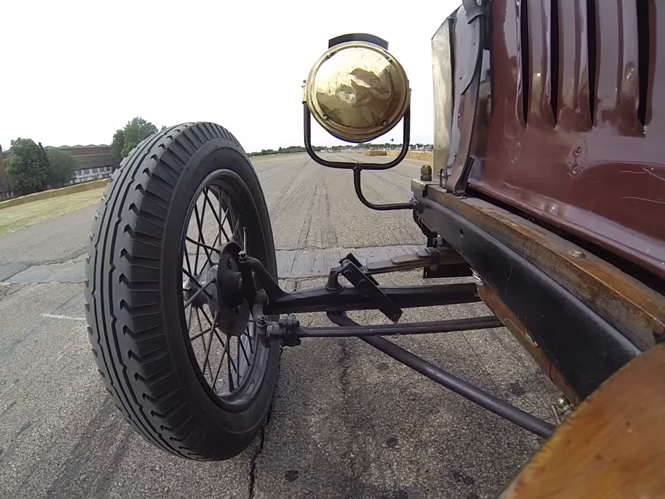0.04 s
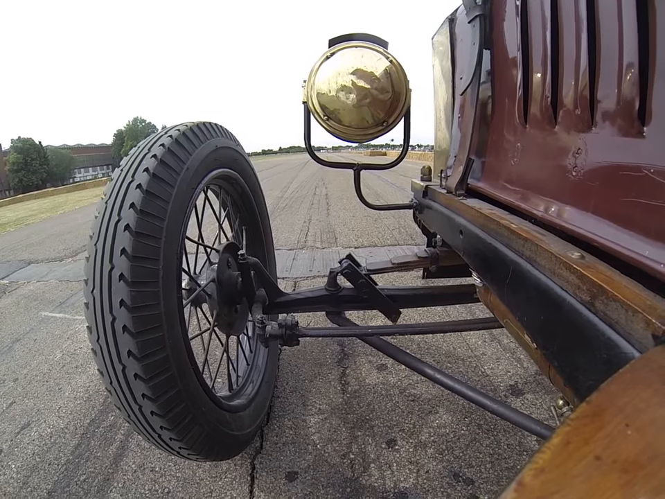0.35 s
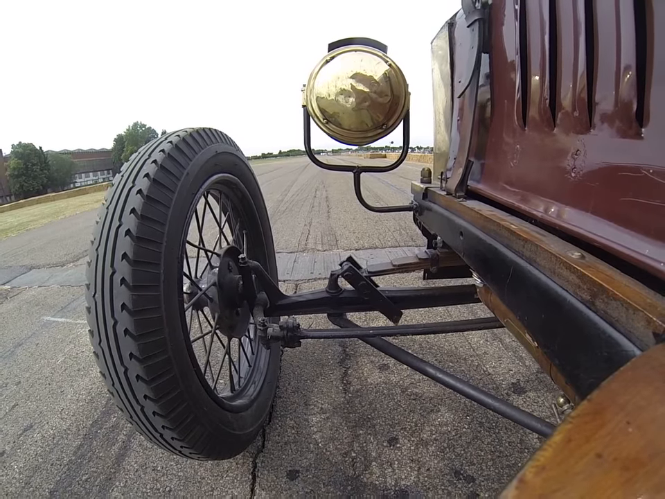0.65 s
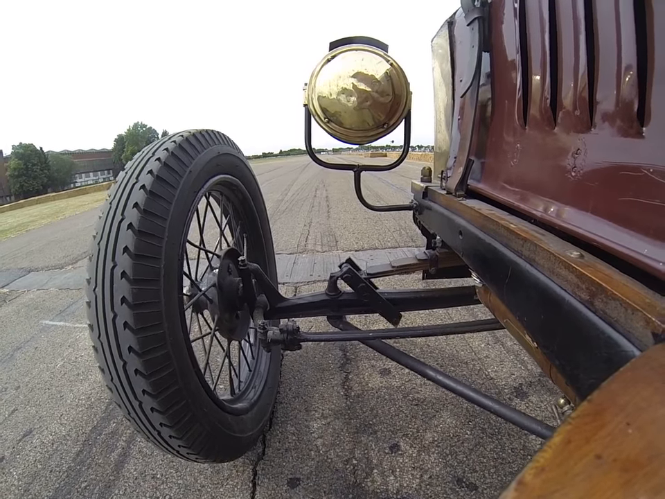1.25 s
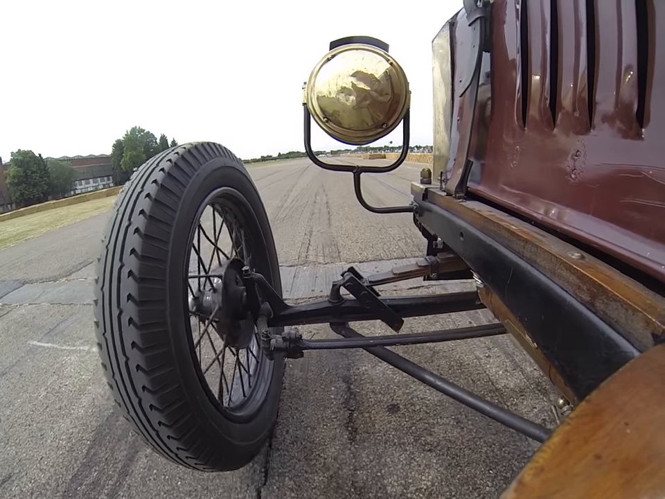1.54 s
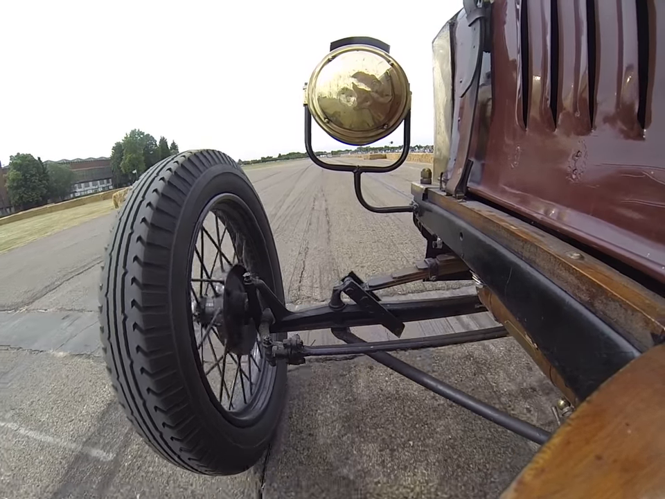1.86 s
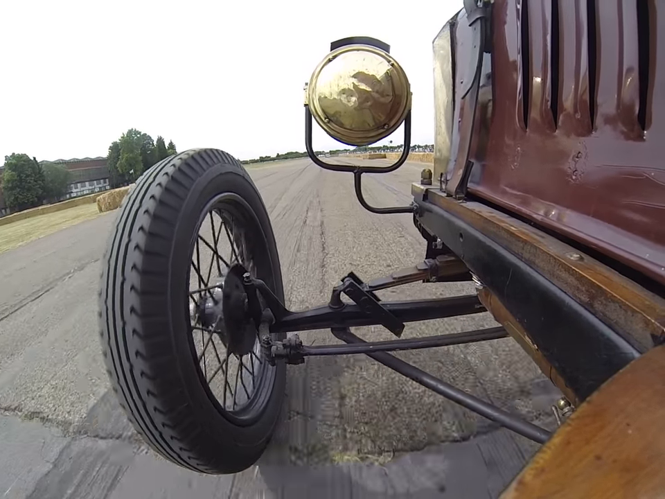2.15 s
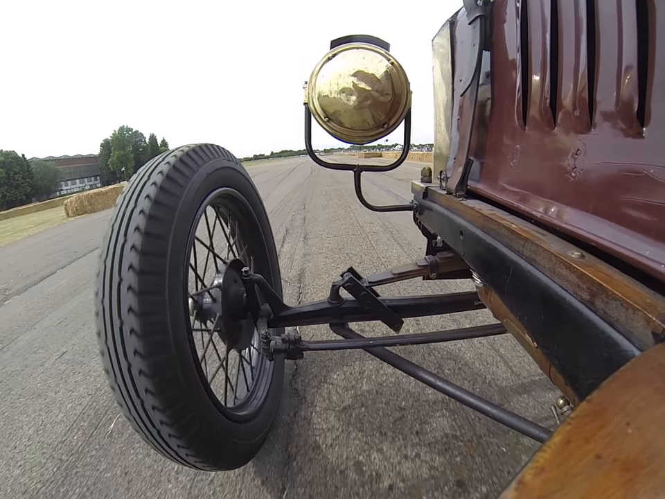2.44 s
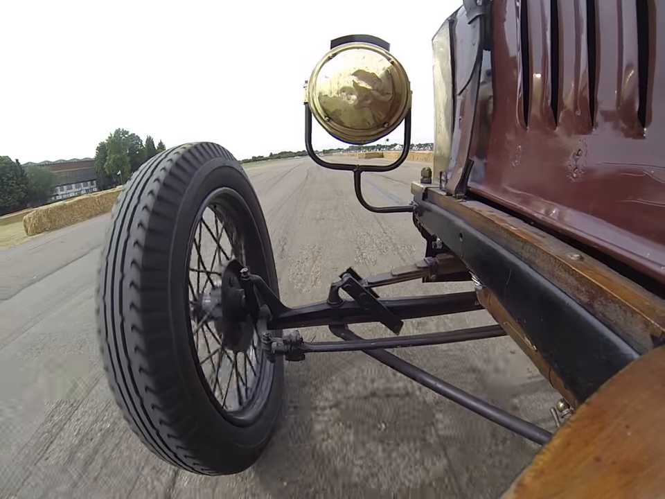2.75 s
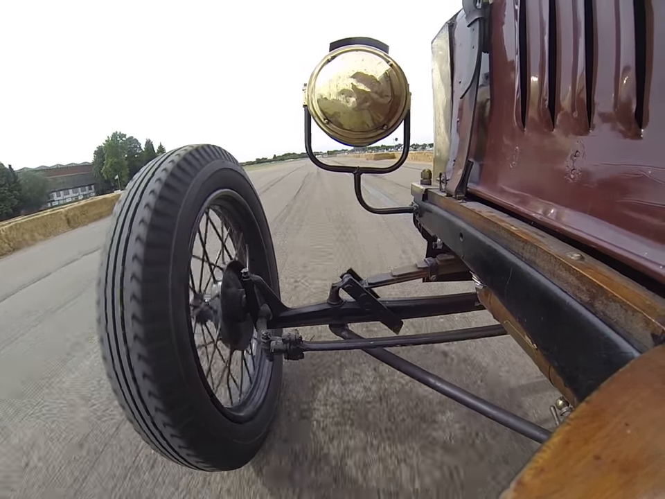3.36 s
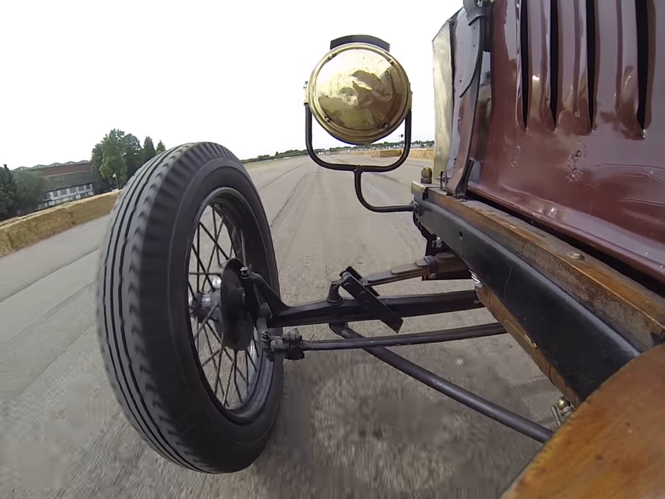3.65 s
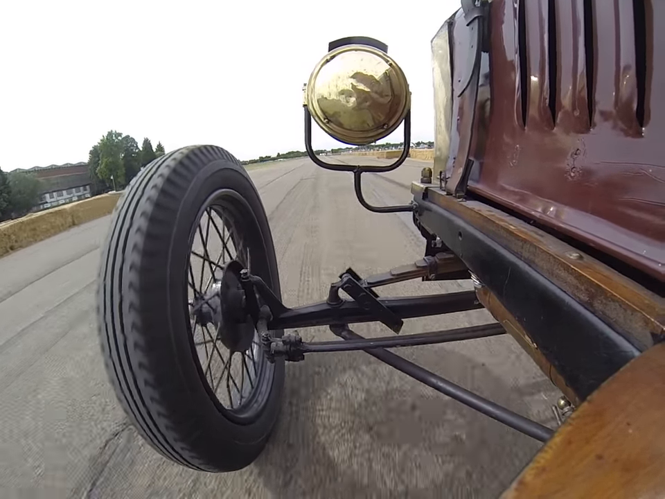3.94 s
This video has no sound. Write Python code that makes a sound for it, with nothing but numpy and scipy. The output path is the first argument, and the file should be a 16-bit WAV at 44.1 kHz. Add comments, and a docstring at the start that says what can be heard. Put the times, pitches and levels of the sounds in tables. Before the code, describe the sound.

An old car's petrol engine idles, revs, sags, then pulls away with a throaty clatter.

```python
"""A vintage four-cylinder petrol engine, heard from beside the car's bonnet.
It idles, revs, sags as the clutch bites, then pulls away. Every firing thumps the exhaust and
barks in a throaty resonance, one cylinder harder than the others. The valve gear clatters,
loose fittings tick, and a little wind rumbles on the microphone."""
import sys
import numpy as np
from scipy import signal
from scipy.fft import rfft, irfft, next_fast_len
from scipy.io import wavfile
from scipy.ndimage import uniform_filter1d, minimum_filter1d, map_coordinates

SR = 44100
rng = np.random.default_rng(int(sys.argv[2]) if len(sys.argv) > 2 else 0)


def digitize_waveform(pressure):
    """Quantize a signal to 16-bit integers and store it at the path in sys.argv[1].

    Rows of a 2-D input are taken as channels; values are limited to [-1, 1].
    """
    field = np.atleast_2d(pressure).T
    bounded = np.clip(field, -1, 1)
    quanta = np.round(bounded * 32767).astype(np.int16)
    wavfile.write(sys.argv[1], SR, quanta)


N = 176400

# Engine metal response. Each row: frequency in Hz, gain in dB.
METAL_COLOUR = [(450, -24), (760, 1), (900, -7.5), (1100, -11), (1320, -2), (1500, -2.5), (1780, 1.5),
                (1950, 1), (2180, -10.5), (2480, -11.5), (2850, -23.5), (3400, -26.5), (4500, -33.5),
                (7000, -62.5)]
# Upper engine layers. Each row: time in seconds, then bark, tap and hiss levels in dB before trim.
UPPER_LEVELS = [(0.11, -25, -35.8, -58), (0.2, -20.3, -34, -61.5), (0.33, -29, -38.5, -65),
                (0.43, -25, -34.5, -59.5), (0.58, -30.5, -39.5, -64), (0.7, -22, -36, -57.5),
                (0.83, -26, -34, -57.5), (0.94, -22, -35.7, -60), (1.03, -20.5, -32.5, -55),
                (1.4, -18.2, -28.5, -53.5), (1.7, -20.5, -28, -53), (1.95, -17.5, -24.5, -50.5),
                (2.1, -23, -29.5, -55), (2.25, -19, -29.5, -54), (2.35, -27.5, -29.5, -58),
                (2.48, -17, -31, -53.5), (2.6, -21, -39, -57.5), (2.73, -22.5, -36.7, -63),
                (2.87, -21, -36, -57.1), (3.0, -20, -31, -55.5), (3.3, -16.5, -32.5, -53.5),
                (3.55, -15.5, -29.5, -51.5), (3.75, -16.5, -31.5, -53), (3.95, -16.5, -29.5, -52.0)]


def amp(db):
    """Decibels to gain."""
    return 10 ** (np.asarray(db) / 20)


def curves(rows):
    """One value per sample for each column after the time."""
    times_s, *columns = np.transpose(rows)
    return [np.interp(np.arange(N) / SR, times_s, column) for column in columns]


def wobble(rate_hz):
    """Smooth random curve, rate_hz knots a second."""
    knots = rng.standard_normal(int(N * rate_hz / SR) + 4)
    return map_coordinates(knots, [np.arange(N) * rate_hz / SR])


def steady(x):
    """x with its slow level held at rms 1."""
    power = uniform_filter1d(uniform_filter1d(x * x, size=6000), size=6000)
    return x / np.sqrt(np.abs(power) + 1e-14)


def ring(x, colour):
    """x through a minimum-phase body with the given (Hz, dB) colour, rolled off above it."""
    size = 2 * next_fast_len(N // 2 + 8192)
    bins_hz = np.fft.rfftfreq(size, 1 / SR)
    hz, db = np.transpose(colour)
    gain = amp(np.interp(np.log(bins_hz + 1), np.log(hz + 1), db))
    gain /= 1 + (bins_hz / (2 * hz.max())) ** 4
    cepstrum = irfft(np.log(np.maximum(gain, 1e-6)), size)
    cepstrum[1:size // 2] *= 2
    cepstrum[size // 2 + 1:] = 0
    return irfft(rfft(x, size) * np.exp(rfft(cepstrum)), size)[:N]


def puffs(hits, decay_s):
    """A burst of turbulence after each impulse, with the impulse's energy."""
    decay = np.exp(-np.arange(SR // 8) / SR / decay_s)
    return signal.fftconvolve(hits, decay / np.linalg.norm(decay))[:N] * rng.standard_normal(N)


def strokes(turns, cylinders_db, scatter_db, jitter_s, per_turn=2):
    """Impulses locked to the crank, sized by the cylinder whose turn it is."""
    stroke = np.arange(np.ceil(turns[0] * per_turn), turns[-1] * per_turn).astype(int)
    timing, strength = rng.standard_normal((len(stroke), 2)).T
    at = np.interp(stroke / per_turn, turns, np.arange(N)) + jitter_s * SR * timing
    cylinder = (stroke * 2 // per_turn) % len(cylinders_db)
    level_db = np.asarray(cylinders_db)[cylinder] + scatter_db * strength
    return np.bincount(np.clip(at, 0, N - 1).astype(int), amp(level_db), N)


def blows(rows, colour, decay_s, rough):
    """Single blows, impulse plus noise burst, through a body; one per (start s, peak dB) row."""
    out = np.zeros(2 * N)
    body = ring(signal.unit_impulse(N), colour)[:SR // 8]
    decay = np.exp(-np.arange(SR // 8) / SR / decay_s)
    for start_s, peak_db in rows:
        push = rough * decay / np.linalg.norm(decay) * rng.standard_normal(len(decay))
        push[0] += 1
        blow = signal.fftconvolve(push, body)
        out[round(start_s * SR):][:len(blow)] += amp(peak_db) * blow / np.abs(blow).max()
    return out[:N]


def voice(hits, colour, rough, decay_s, flow):
    """Pulses, their turbulence and unbroken flow noise ringing one body, at rms 1."""
    drive = steady(hits + rough * puffs(hits, decay_s)) + flow * rng.standard_normal(N)
    return steady(ring(drive, colour))


def drone(turns, orders_db, flutter_db):
    """Clean low orders of the crankshaft; the second is the firing note."""
    trims_db = [0.15, 1.2, 1.1, 0.74, -0.27]  # orders 1-5
    out = np.zeros(N)
    for order, (level_db, trim_db) in enumerate(zip(orders_db, trims_db), start=1):
        rms = amp(level_db + trim_db + flutter_db * wobble(rate_hz=16))
        out += np.sqrt(2) * rms * np.sin(2 * np.pi * (order * turns + rng.random()))
    return out


def exhaust(turns):
    """Firings boom and rasp in the pipe; it coughs as the throttle opens or the load takes hold."""
    cylinders_db = [6.5, -3.5, -2.5, 4]  # strengths in firing order
    # Each row: time in seconds, then boom and rasp levels in dB before trim.
    levels = [(0.05, -25.5, -36), (0.2, -17.5, -22), (0.35, -30, -32.5), (0.44, -16, -28.5),
              (0.6, -18, -27.5), (0.75, -16, -22.5), (0.95, -19.5, -21), (1.13, -17, -24),
              (1.35, -27.5, -23.5), (1.7, -22.5, -26), (2.05, -23, -30.5), (2.25, -16, -28),
              (2.5, -16.5, -26), (2.75, -26.5, -26), (3.05, -20, -28), (3.4, -22, -26),
              (3.97, -20.5, -21.5)]
    # Each row: start in seconds, peak in dB.
    coughs = [(0.421, -6), (0.533, -6.5), (0.801, -7.5), (2.628, -4), (2.695, -11.5), (2.818, -9.5)]
    # Pipe responses. Each row: frequency in Hz, gain in dB.
    boom_colour = [(40, -28), (70, -10.5), (100, -1.5), (125, 2), (148, -3), (180, -18.5), (350, -43.5),
                   (900, -74)]
    rasp_colour = [(90, -37), (165, -9), (200, -2.5), (240, 0), (290, 0), (320, -5.5), (365, -14),
                   (600, -30.5), (1500, -62)]
    cough_colour = [(30, -11.5), (125, 6), (280, -7.5), (600, -30), (2000, -46)]
    boom_db, rasp_db = curves(levels)
    firings = strokes(turns, cylinders_db, scatter_db=2.5, jitter_s=0.00042)
    boom = amp(boom_db + 0.25) * voice(firings, boom_colour, rough=0.85, decay_s=0.012, flow=0.45)
    rasp = amp(rasp_db - 0.3) * voice(firings, rasp_colour, rough=0.4, decay_s=0.012, flow=0.68)
    return boom + rasp + blows(coughs, cough_colour, decay_s=0.0088, rough=0.13)


def bark(turns):
    """Throaty resonance that one cylinder strikes hardest; single hard firings also crack."""
    cylinders_db = [5, 2, -0.5, -3.5]  # strengths in firing order
    # Resonance. Each row: frequency in Hz, gain in dB.
    throat_colour = [(200, -45.5), (350, -22), (410, -2.5), (460, 1), (515, 0), (590, -7), (690, -17.5),
                     (770, -16), (950, -22.5), (1200, -29), (1900, -30.5), (2550, -29.5), (3300, -44.5),
                     (5000, -67)]
    # Each row: start in seconds, peak in dB before trim.
    hard_firings = [(0.191, -12), (0.711, -9.5), (1.002, -8), (1.054, -8.5), (1.102, -10), (1.244, -6.5),
                    (1.411, -8.5), (1.876, -8.5), (2.494, -14.5), (2.977, -10), (3.045, -10), (3.101, -6.5),
                    (3.148, -8), (3.255, -8), (3.359, -6.5), (3.456, -12.5), (3.503, -10.5), (3.585, -13)]
    bark_db, _, _ = curves(UPPER_LEVELS)
    firings = strokes(turns, cylinders_db, scatter_db=2.5, jitter_s=0.0001)
    running = amp(bark_db - 0.72) * voice(firings, throat_colour, rough=0.79, decay_s=0.0072, flow=1.0)
    cracks = amp(-14) * blows(hard_firings, METAL_COLOUR, decay_s=0.002, rough=1.5)
    accents = amp(-1) * blows(hard_firings, throat_colour, decay_s=0.0034, rough=0.29)
    return running + accents + cracks


def valve_clatter(turns):
    """Valve gear taps, each with a thin hiss, plus a few louder knocks in the metal."""
    cylinders_db = [0.61, -0.13, -0.49, -0.35]  # strengths in firing order
    # Each row: frequency in Hz, gain in dB.
    hiss_colour = [(2000, -18), (3400, -6), (3740, 4), (4100, -1), (5000, -1), (5500, -3), (5900, -11),
                   (6350, -5.5), (7100, -15), (9000, -20.5), (10000, -16), (11000, -20), (13000, -23.5),
                   (15000, -30)]
    # Each row: start in seconds, peak in dB before trim.
    knocks = [(0.1491, -21), (0.4189, -20), (0.7898, -26), (0.8859, -19), (1.35, -19), (3.4592, -15)]
    _, tap_db, hiss_db = curves(UPPER_LEVELS)
    hits = strokes(turns, cylinders_db, scatter_db=4, jitter_s=0.0002, per_turn=4)
    taps = amp(tap_db) * voice(hits, METAL_COLOUR, rough=2.1, decay_s=0.0051, flow=0.69)
    hiss = amp(hiss_db) * voice(hits, hiss_colour, rough=5, decay_s=0.0033, flow=1.15)
    return taps + hiss + amp(2.5) * blows(knocks, METAL_COLOUR, decay_s=0.003, rough=4.8)


def wind(level_db, gust_db):
    """Uneven low rumble of air on the microphone."""
    # Each row: frequency in Hz, gain in dB.
    rumble_colour = [(8, -11), (25, 5), (60, -7), (120, -7), (300, -16), (1000, -45.5)]
    gusts = amp(level_db + gust_db * wobble(rate_hz=6.886))
    return gusts * steady(ring(rng.standard_normal(N), rumble_colour))


def loose_fittings():
    """Loose parts give short, bright ticks."""
    # Each row: start in seconds, peak in dB before trim.
    ticks = [(0.1915, -45.5), (0.2753, -39), (0.321, -46), (0.425, -41), (0.4425, -37), (0.4998, -45),
             (0.5429, -46), (0.608, -46), (0.7122, -44.5), (0.9044, -45), (1.0482, -42), (1.2028, -47.5),
             (2.502, -41), (2.6963, -45), (3.0635, -44), (3.1704, -46), (3.2591, -45)]
    # Each row: frequency in Hz, gain in dB.
    tick_colour = [(1500, -26.5), (3500, -2), (5000, 3.5), (7500, -6.5), (12000, -13), (16000, -30.5)]
    return amp(0.5) * blows(ticks, tick_colour, decay_s=0.0018, rough=3.1)


def scene():
    """The crankshaft paces the running engine; ticks and wind lie on top."""
    # Each row: time in seconds, speed in turns per second, levels of orders 1-5 in dB before trim.
    crank = [(0.05, 14.95, -35, -14, -21, -37, -38), (0.27, 15.41, -49, -13, -30, -35, -35.5),
             (0.4, 15.63, -38, -14, -33, -28, -24), (0.52, 19.5, -42, -18, -40, -36, -30),
             (0.68, 25.57, -38, -21.5, -42, -38, -28), (0.88, 31.1, -15.5, -29, -33.5, -35.5, -18),
             (1.02, 37.91, -22, -25.5, -30, -36, -47), (1.15, 43.76, -23, -20.5, -23.5, -22.5, -40),
             (1.3, 48.11, -33, -17.5, -19, -31, -35), (1.45, 49.33, -28, -15, -23.5, -38, -28),
             (1.62, 47.6, -27, -14, -18.5, -29.5, -38), (1.8, 43.54, -25, -18.5, -33, -24.5, -40),
             (1.95, 39.47, -26, -19, -47, -21, -44), (2.08, 35.99, -31, -23, -29, -11, -44),
             (2.2, 32.56, -30, -26, -21, -27.5, -28.5), (2.33, 28.91, -26.5, -27, -38, -34, -12),
             (2.45, 25.48, -23, -21.5, -49, -16, -22), (2.6, 29.88, -31, -25, -36, -17.5, -28),
             (2.8, 32.78, -24.5, -30.5, -23.5, -21.5, -41.5), (3.05, 36.49, -26.5, -22.5, -32, -29, -33),
             (3.4, 41.24, -22.5, -22, -34.5, -35.5, -30.5), (3.7, 44.52, -38, -17.5, -24, -44, -28),
             (3.97, 47.65, -36, -14, -29.5, -32.5, -25.5)]
    speed_hz, *orders_db = curves(crank)
    hard_cylinder_s = 3.456  # crank phase zero: the strongest cylinder fires
    turns = np.cumsum(speed_hz) / SR
    turns -= turns[round(hard_cylinder_s * SR)]
    engine = drone(turns, orders_db, flutter_db=0.85)
    engine += exhaust(turns) + bark(turns) + valve_clatter(turns)
    return (engine + loose_fittings() + wind(level_db=-29.5, gust_db=5.0))[None]


def record(dry):
    """Short fades at both ends, peak limiter, steep low-pass."""
    start_s, fade_s, ceiling, cutoff_hz = 0.035, 0.003, 0.8, 15300
    t = np.arange(N) / SR
    faded = dry[0] * np.clip(np.minimum(t - start_s, t[-1] - t) / fade_s, 0, 1)
    safe_gain = np.minimum(1, ceiling / (np.abs(faded) + 1e-9))
    limited = faded * uniform_filter1d(minimum_filter1d(safe_gain, size=300), size=300)
    lowpass = signal.ellip(10, 0.1, 90, cutoff_hz, fs=SR, output="sos")
    return signal.sosfilt(lowpass, limited)[None]


dry = scene()
out = record(dry)
digitize_waveform(out)
```